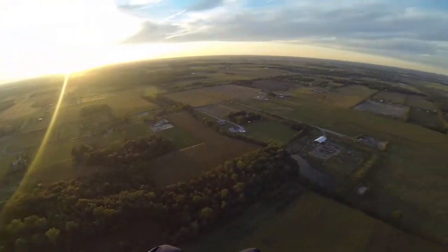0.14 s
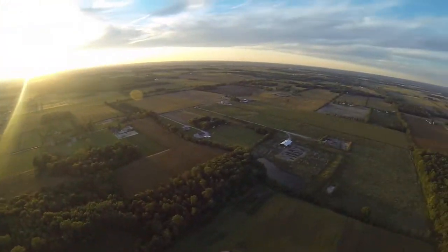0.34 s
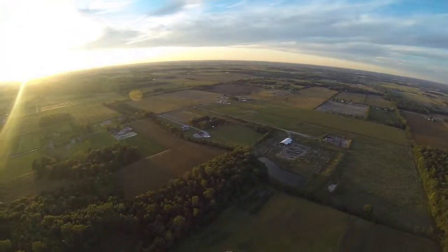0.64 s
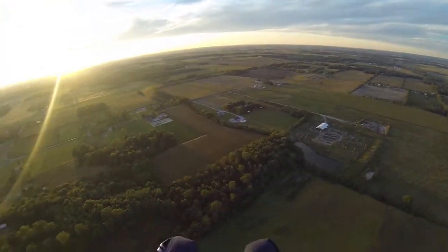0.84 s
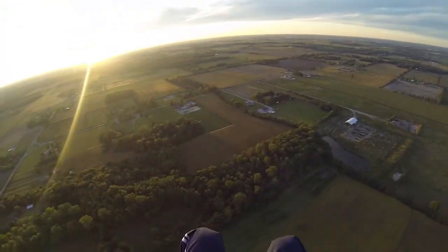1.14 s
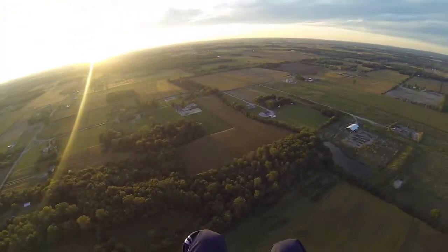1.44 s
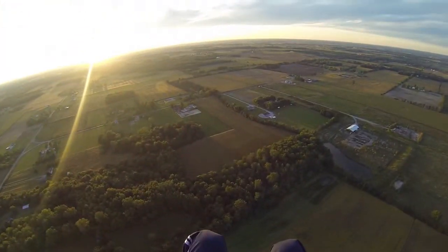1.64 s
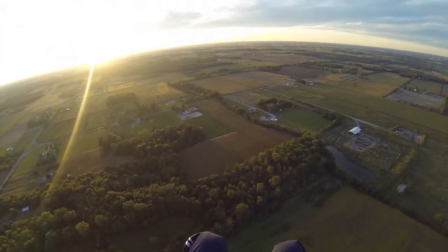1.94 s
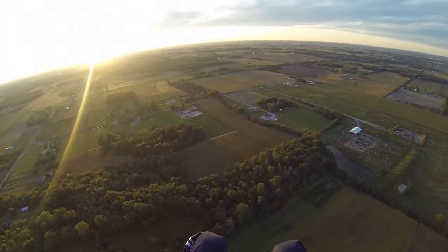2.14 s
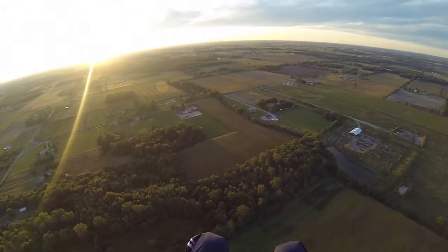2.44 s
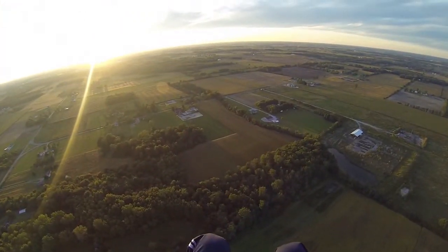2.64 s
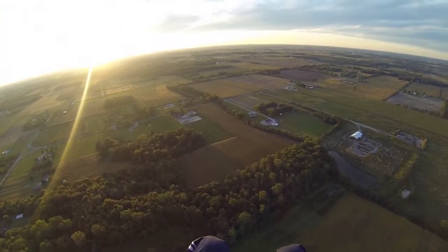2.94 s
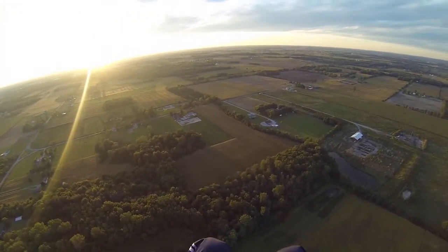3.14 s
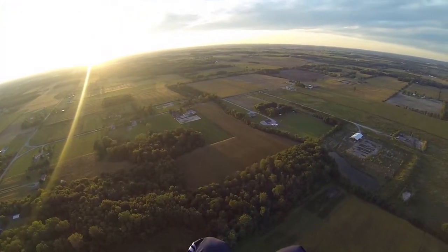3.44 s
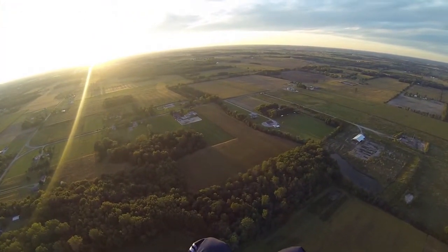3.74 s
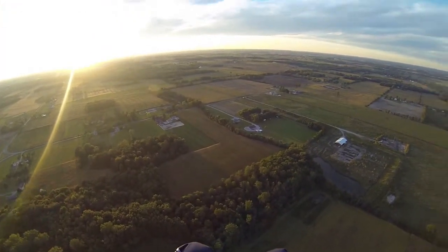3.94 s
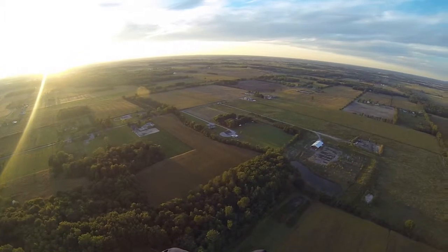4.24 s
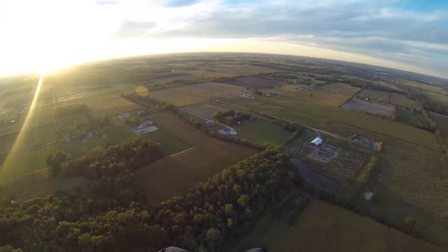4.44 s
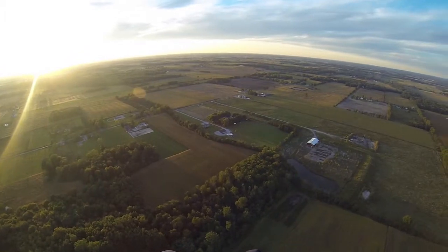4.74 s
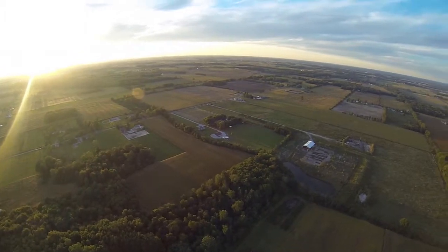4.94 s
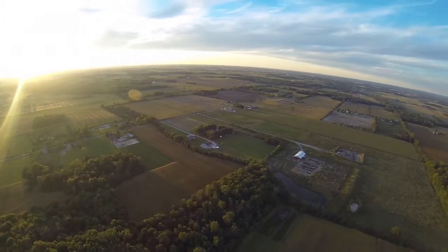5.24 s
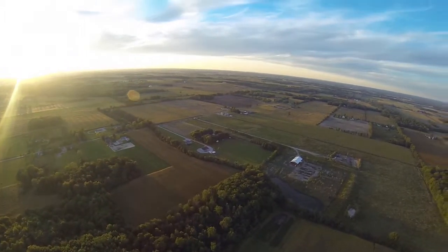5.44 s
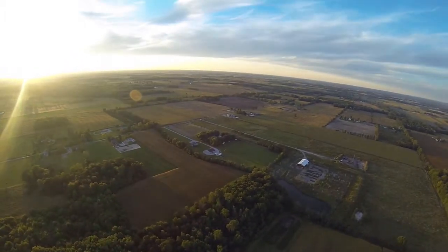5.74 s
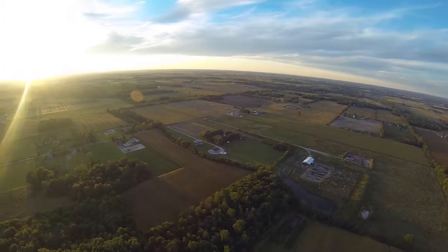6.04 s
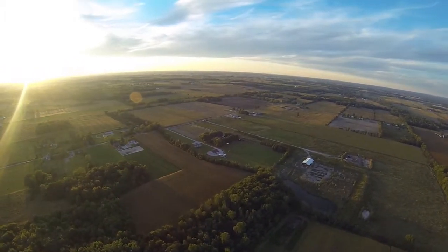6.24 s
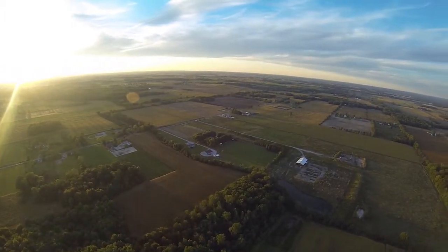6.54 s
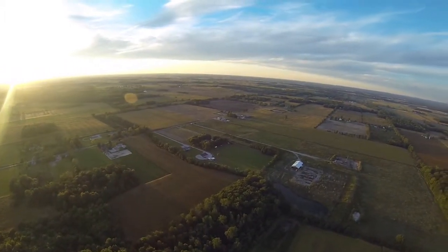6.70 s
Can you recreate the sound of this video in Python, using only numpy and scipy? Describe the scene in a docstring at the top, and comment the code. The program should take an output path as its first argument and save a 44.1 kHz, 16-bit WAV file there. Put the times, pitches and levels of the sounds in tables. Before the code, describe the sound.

A small two-stroke paramotor runs continuously, close to the pilot's microphone in open air. Its hard, nasal buzz sits over muffled exhaust and a humming, chopping propeller. Wind buffets low, strongest at the start. The pitch slides down gently, drops more clearly around four seconds, then rises slightly near the end. There is no echo.

```python
"""A paramotor in flight, heard at the pilot. Airstream buffets the microphone, harder over the first second or two.
Throughout, each turn of the two-stroke sounds a short honk near 1.4 kHz, probably at the air intake, over
muffled exhaust lines; the geared-down propeller hums and chops noise bands of rushing air at its blade rate.
The crank slows gently from 84 to 80 turns/s by 3.5 s, the throttle eases it to 73 by 5 s, then it regains 76.
"""
import sys
import numpy as np
from scipy import signal
from scipy.fft import rfft, irfft, next_fast_len
from scipy.io import wavfile

SR = 44100
rng = np.random.default_rng(int(sys.argv[2]) if len(sys.argv) > 2 else 0)


def waveform_to_disk(signal):
    """Save audio, clipped to [-1, 1], as 16-bit WAV at the path in sys.argv[1]."""
    frames = np.transpose(np.atleast_2d(signal))
    scaled = np.clip(frames, -1, 1) * 32767
    samples = np.round(scaled).astype(np.int16)
    wavfile.write(sys.argv[1], SR, samples)


N = 302967
TIME_S = np.arange(N) / SR
FFT_SIZE = next_fast_len(N)
BINS_HZ = np.fft.rfftfreq(FFT_SIZE, 1 / SR)

REFERENCE_CRANK_HZ = 80  # relative speed 1
START_TURNS = 0.2872  # crank angle at t = 0
BLADES_PER_TURN = 0.7812  # blade passages per crank turn, after gearing
EARLY_GUST_DB, GUST_SETTLE_S = 2.5, 1.2
GUST_SPREAD_DB, GUST_RATE_HZ = 0.5, 2.2
TOP_HZ = 14500

# wind on the microphone, before gusts: f/Hz, density/dB per Hz
BUFFET_SPECTRUM = [(10, -61.5), (35, -57), (62, -56.5), (85, -49), (120, -53.5), (170, -68.5), (260, -68),
                   (500, -74.5), (1200, -90.5), (5000, -125)]
# air ringing in frame and cage, at relative speed 1: f/Hz, width/Hz, density/dB per Hz,
# moment/blade passage (0-1), chop depth/1, power of speed/1
AIR_RESONANCES = [ (350, 85, -69.5, 0, 0.17, 3.8), (728, 142, -66.5, .4, 0.57, 1.4),
                  (1154, 253, -61.5, .5, 0.46, 4), (1410, 225, -48, .55, .3, 3),
                  (1810, 285, -57.5, 0.1, 0.28, 0.33), (2235, 265, -67, 0.5, 0.5, 2.8),
                  (2576, 280, -73, .55, 0.27, 1.2), (3070, 407, -72.5, .55, 0.49, 2.3),
                  (3750, 1150, -84, 0.3, 0.22, 1.5), (5420, 1140, -88.5, .17, .17, .7),
                  (7500, 1800, -93.8, .2, .18, 1.6), (10100, 2600, -100.5, .3, .24, 2.8),
                  (12700, 2600, -107, .33, .24, 1.7), ]
# propeller harmonics, before boost and speed: multiple of blade rate/1, rms level/dB
BLADE_HARMONICS = [(1, -50.5), (2, -46.5), (3, -47.5), (4, -52.5), (5, -51.5), (6, -48), (7, -58.5),
                   (8, -55), (9, -61), (10, -53), (11, -48.5), (12, -48), (14, -53), (15, -48.5),
                   (16, -60.5), (17, -61), (18, -49), (19, -46), (21, -42), (22, -51.5), (23, -51),
                   (24, -47.5), (28, -49.5), (31, -47)]
# engine harmonics outside the honk, shaped by pipe and silencer: f/Hz, rms level of a line/dB
EXHAUST_RESPONSE = [(80, -38.5), (160, -64.5), (320, -51), (470, -64), (600, -51), (740, -47.5),
                    (850, -67.5), (1000, -60), (1140, -40.5), (1350, -61), (1545, -30), (1620, -58.5),
                    (1940, -49), (2300, -69)]
# crank speed under the throttle: t/s, f/Hz
CRANK_SPEED = [(0.0, 84.35), (0.49, 84.74), (1.83, 82.39), (2.74, 81.7), (3.54, 80.45), (4.07, 76.76),
               (4.49, 75.38), (4.66, 73.9), (4.99, 72.96), (6.34, 74.3), (6.87, 76.11)]
# intake honk: t/s, level/dB
HONK_LEVEL_CURVE = [(0.0, -14.5), (0.75, -16.5), (1.5, -15), (3.6, -16), (3.95, -13.9), (4.5, -16),
                    (5.65, -15), (6.87, -15.5)]


def undb(db):
    """Decibels to amplitude gain."""
    return 10 ** (np.asarray(db) / 20)


def shape_db(points, hz):
    """Interpolate (f/Hz, level/dB) points on a log-frequency axis."""
    at_hz, db = np.transpose(points)
    return np.interp(np.log(hz + 1e-3), np.log(at_hz), db)


def resonance(hz, centre_hz, width_hz):
    """Amplitude gain of a flat-topped resonance, -3 dB at half the width either side."""
    return 1 / np.sqrt(1 + (2 * (hz - centre_hz) / width_hz) ** 4)


def noise(density):
    """Gaussian noise with the given amplitude per root Hz at BINS_HZ."""
    spectrum = rfft(rng.standard_normal(FFT_SIZE)) * density
    return irfft(spectrum, FFT_SIZE)[:N] * np.sqrt(SR / 2)


def walk(rate_hz):
    """Smooth random drift, zero mean, unit spread, changing about rate_hz times a second."""
    drift = noise(resonance(BINS_HZ, 0, rate_hz) ** 2)
    return (drift - drift.mean()) / drift.std()


def harmonics(turns, lines, waver_db):
    """Sines at multiples of a rotation, each wavering in level on its own."""
    out = np.zeros(N)
    for multiple, db in lines:
        level = undb(db + waver_db * walk(9))
        out += level * np.sin(2 * np.pi * (multiple * turns + rng.random()))
    return np.sqrt(2) * out  # levels are rms


def chop(passes, depth):
    """Turbulence gain peaking as each blade goes by; unit mean power."""
    gate = np.exp(depth * np.cos(2 * np.pi * passes))
    return gate / np.sqrt(np.mean(gate ** 2))


def gusts():
    """Buffeting level in dB: stronger at first, then settled, with random swells."""
    early_db = EARLY_GUST_DB * np.exp(-(TIME_S / GUST_SETTLE_S) ** 2)
    return early_db + GUST_SPREAD_DB * walk(GUST_RATE_HZ)


def wind(turns, gust_db):
    """Low-heavy turbulence noise on the microphone, gusty and pumped by the blades."""
    rumble = noise(undb(shape_db(BUFFET_SPECTRUM, BINS_HZ)))
    pumped = rumble * chop(BLADES_PER_TURN * turns, depth=0.07)
    return pumped * undb(gust_db + 0.47 * walk(2.6))


def swish(passes, speed):
    """Each airflow resonance peaks at its own point of the blade's sweep and grows with speed."""
    out = np.zeros(N)
    for hz, width_hz, db, moment, depth, power in AIR_RESONANCES:
        air = undb(db + 1.0 * walk(39)) * noise(resonance(BINS_HZ, hz, width_hz))
        out += air * chop(passes - moment, depth) * speed ** power
    return out


def propeller(turns, hz, boost_db=10):
    """Blade harmonics, chopped air and frame shudder; blades wander slightly against the crank."""
    passes = BLADES_PER_TURN * turns + 0.0099 * walk(4)
    speed = hz / REFERENCE_CRANK_HZ
    lines = []
    for multiple, db in BLADE_HARMONICS:
        # harmonics swell as they slide through the honk's resonance
        boost = boost_db * resonance(multiple * BLADES_PER_TURN * hz, 1380, 160)
        lines.append((multiple, db + boost))
    tones = harmonics(passes, lines, waver_db=2.0) * speed ** 1.4
    # crank and blades beat against each other and shake the frame
    shudder = undb(-36) * np.sin(2 * np.pi * (turns - passes))
    return tones + swish(passes, speed) + shudder


def honk(turns, hz, ring_hz, rise, swell_s, shorten, scatter_db, jitter_s):
    """Once a turn the port opens and the airbox tone swells and dies; shorter and higher with speed."""
    chance = rng.standard_normal((int(turns[-1]) + 4, 2))  # per turn: timing, level
    speed = hz / REFERENCE_CRANK_HZ
    out = np.zeros(N)
    for neighbour in range(3):  # skirts of successive bursts overlap
        turn = np.round(turns).astype(int) + neighbour
        age_s = (turns + 1 - turn) / hz + jitter_s * chance[turn, 0]
        level = undb(scatter_db * chance[turn, 1])
        swell = level / np.cosh(age_s * speed ** shorten / swell_s)
        out += swell * np.sin(2 * np.pi * ring_hz * speed ** rise * age_s)
    return out / out.std()


def engine(turns, hz, honk_db, count=29):
    """Intake honk over quiet exhaust harmonics, which slide through fixed resonances."""
    intake = honk(turns, hz, ring_hz=1374, rise=0.23, swell_s=0.0014, shorten=3.2,
                  scatter_db=0.16, jitter_s=0.00001)
    lines = [(k, shape_db(EXHAUST_RESPONSE, k * hz)) for k in range(1, count + 1)]
    exhaust = harmonics(turns, lines, waver_db=1.5)
    return undb(honk_db) * intake + exhaust


def scene():
    """One crank speed drives engine, propeller and the pumping of the wind."""
    hz = np.interp(TIME_S, *np.transpose(CRANK_SPEED))
    honk_db = np.interp(TIME_S, *np.transpose(HONK_LEVEL_CURVE))
    turns = np.cumsum(hz) / SR + START_TURNS
    mix = wind(turns, gusts()) + propeller(turns, hz) + engine(turns, hz, honk_db)
    return mix[None]


def record(dry):
    """2 ms sine fades at both ends, then a steep low-pass at TOP_HZ."""
    edge_s = np.minimum(TIME_S, TIME_S[-1] - TIME_S)
    ease = np.sin(np.pi / 2 * np.clip(edge_s / 0.002, 0, 1))
    low_pass = signal.ellip(8, 0.2, 70, TOP_HZ, fs=SR, output="sos")
    return signal.sosfilt(low_pass, dry * ease)


dry = scene()
out = record(dry)
waveform_to_disk(out)
```